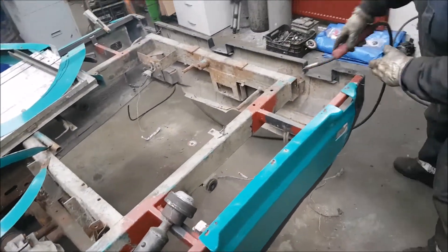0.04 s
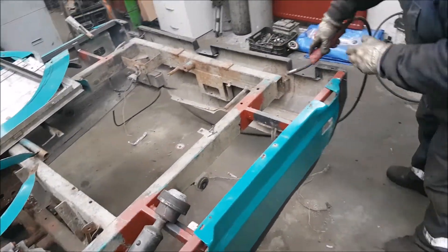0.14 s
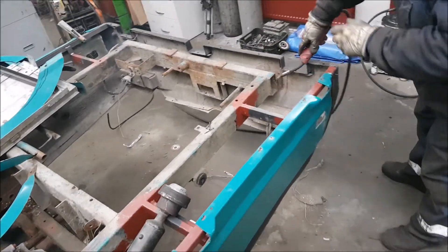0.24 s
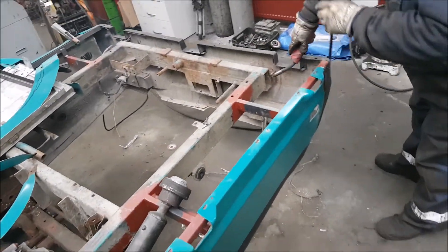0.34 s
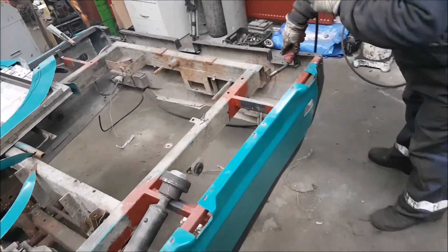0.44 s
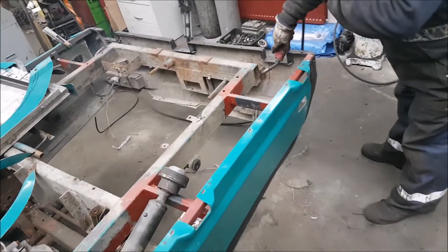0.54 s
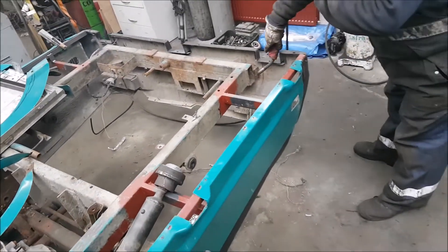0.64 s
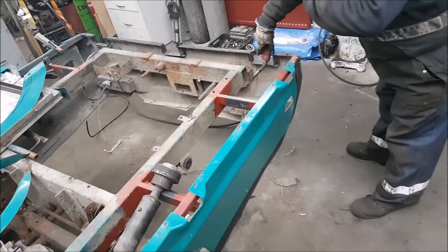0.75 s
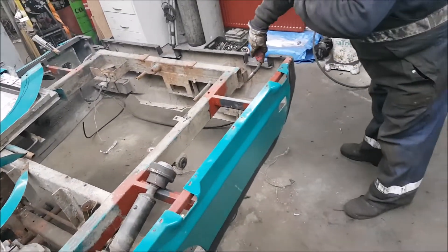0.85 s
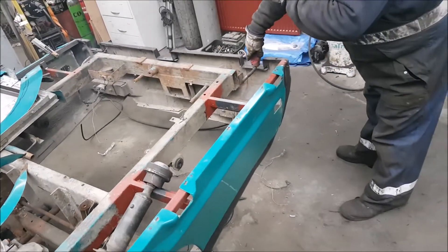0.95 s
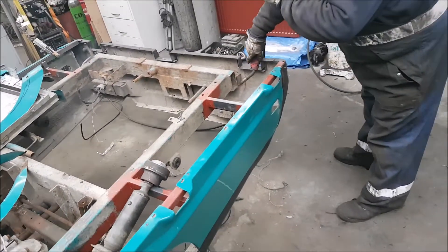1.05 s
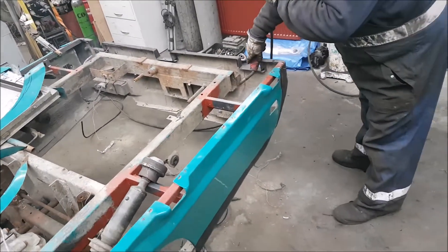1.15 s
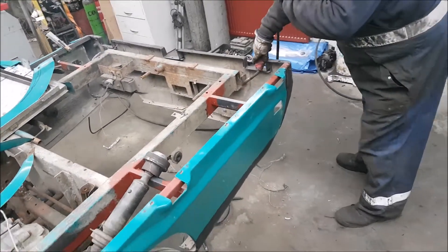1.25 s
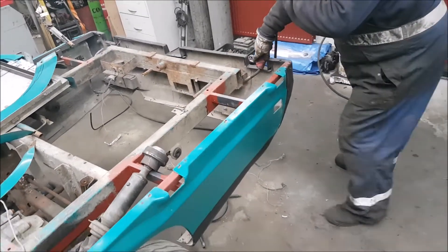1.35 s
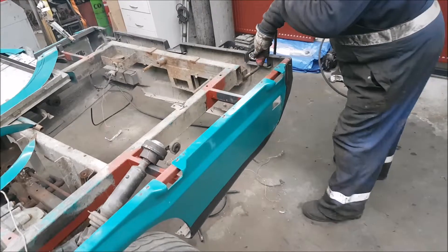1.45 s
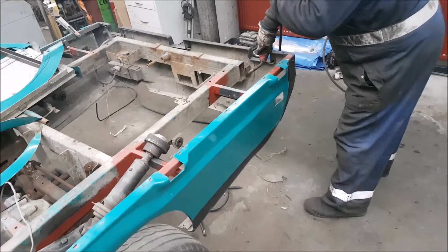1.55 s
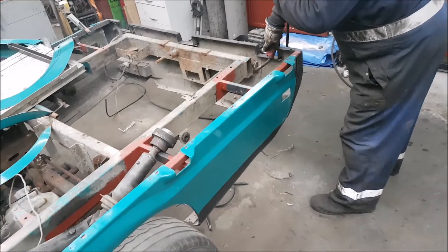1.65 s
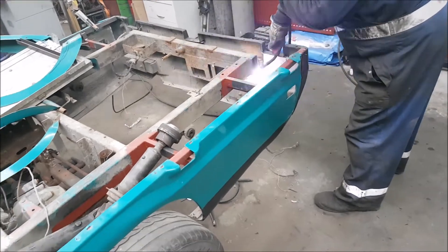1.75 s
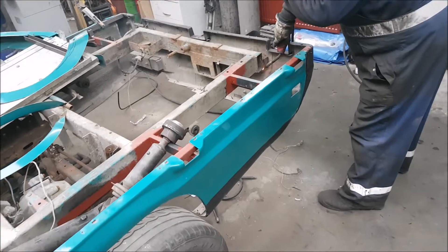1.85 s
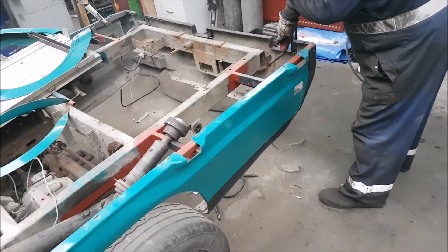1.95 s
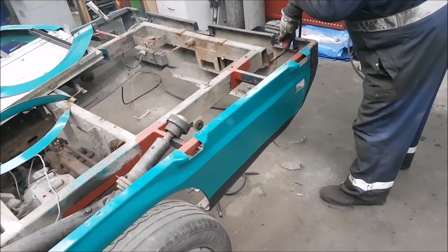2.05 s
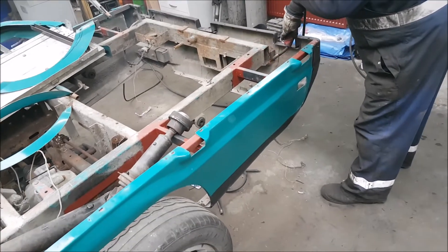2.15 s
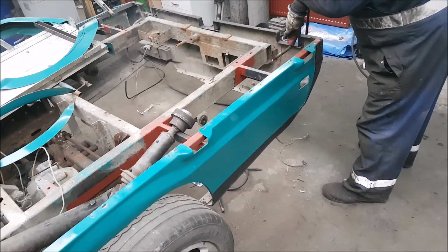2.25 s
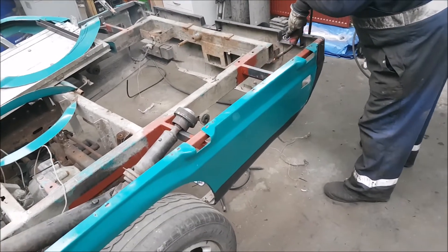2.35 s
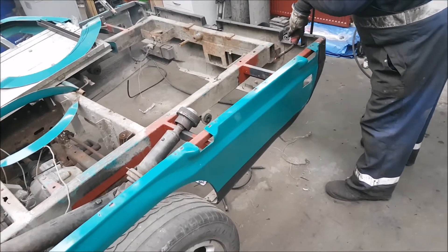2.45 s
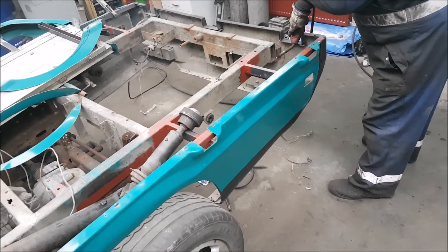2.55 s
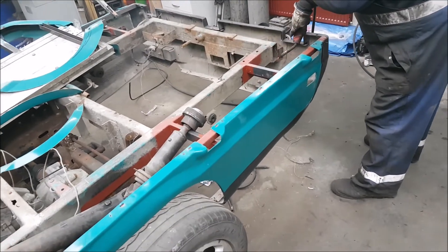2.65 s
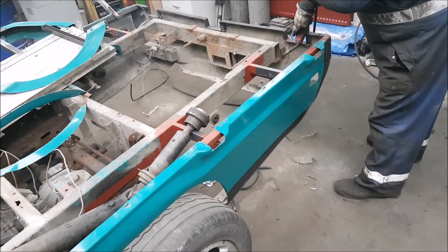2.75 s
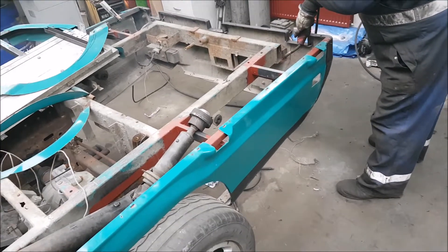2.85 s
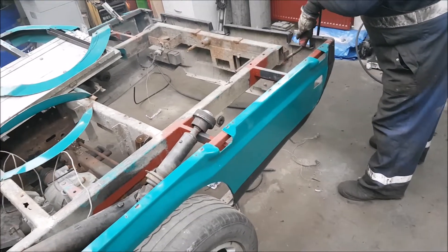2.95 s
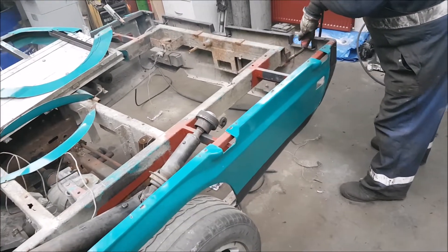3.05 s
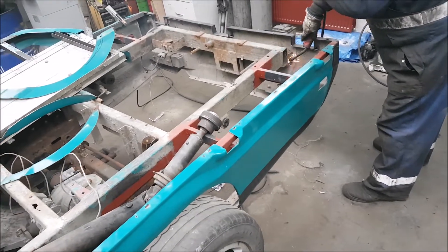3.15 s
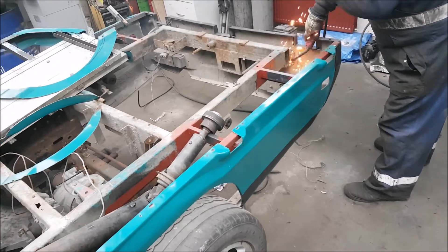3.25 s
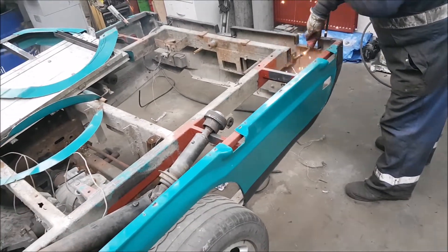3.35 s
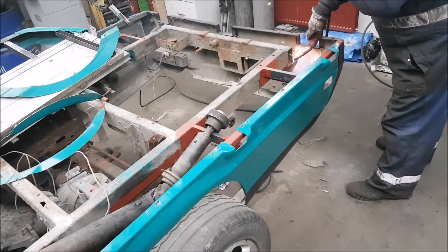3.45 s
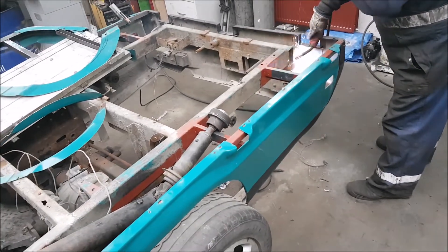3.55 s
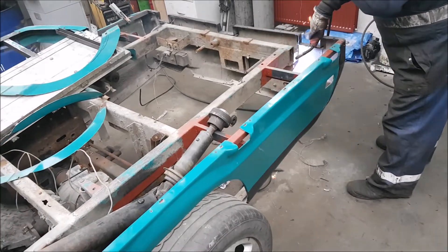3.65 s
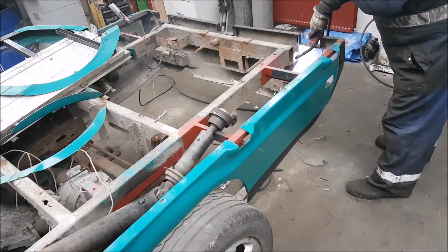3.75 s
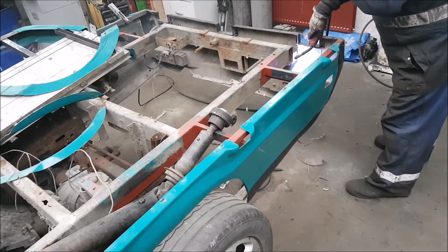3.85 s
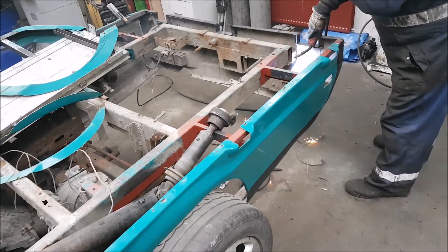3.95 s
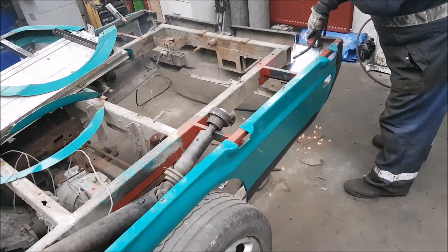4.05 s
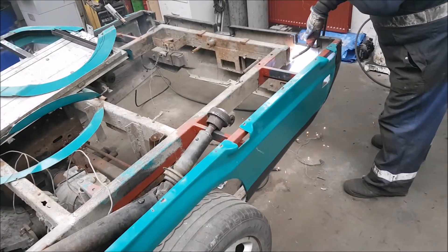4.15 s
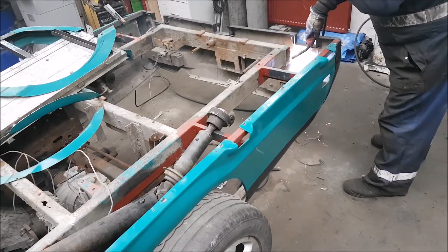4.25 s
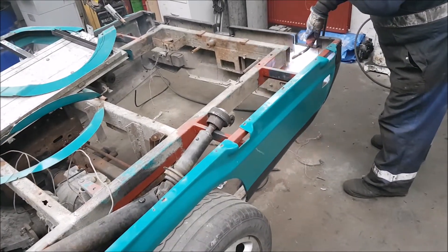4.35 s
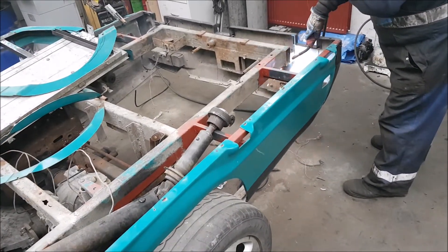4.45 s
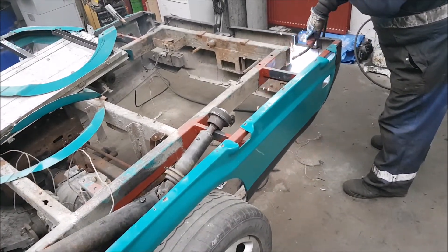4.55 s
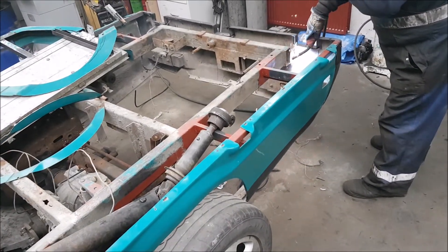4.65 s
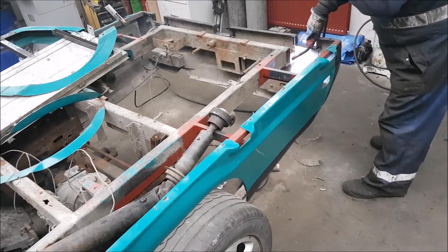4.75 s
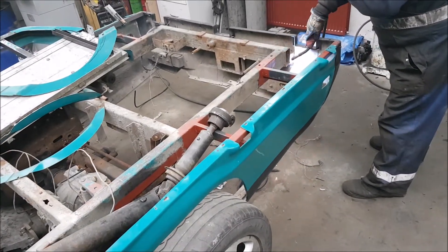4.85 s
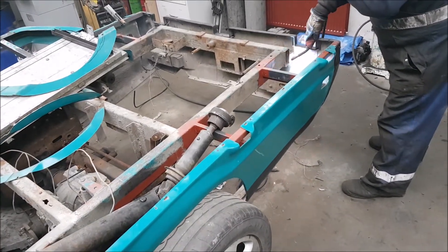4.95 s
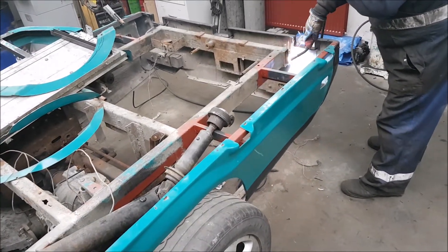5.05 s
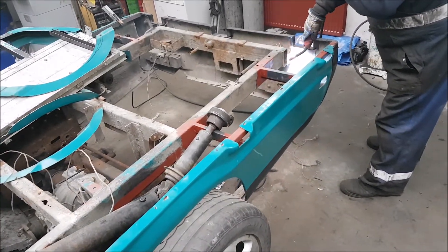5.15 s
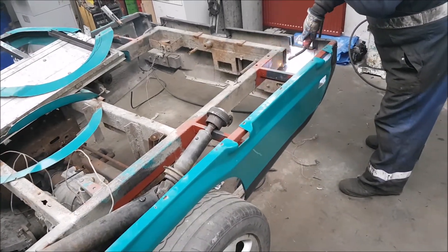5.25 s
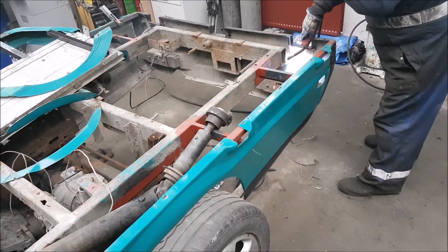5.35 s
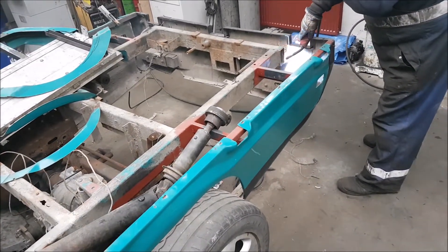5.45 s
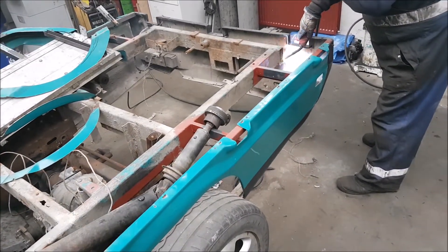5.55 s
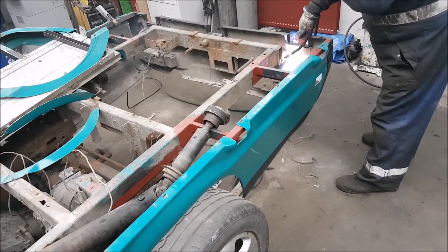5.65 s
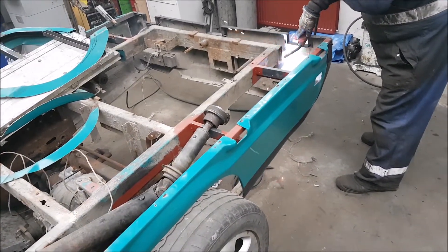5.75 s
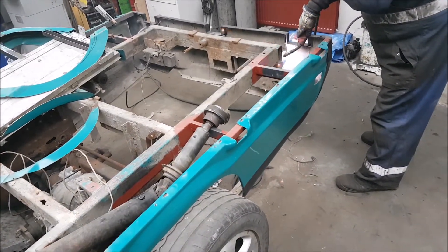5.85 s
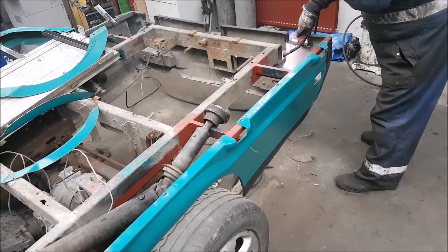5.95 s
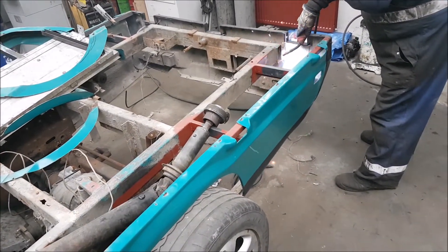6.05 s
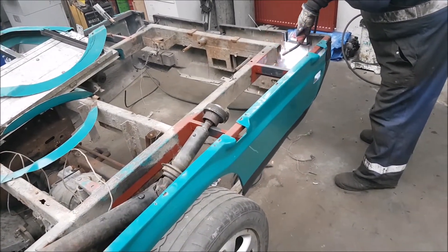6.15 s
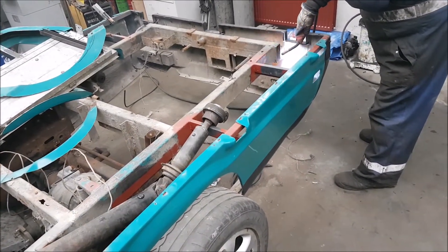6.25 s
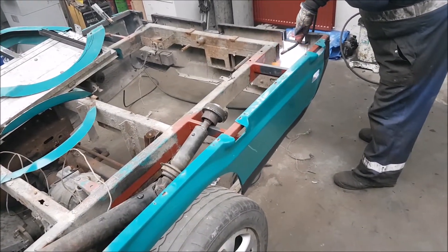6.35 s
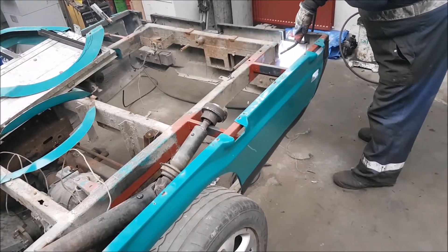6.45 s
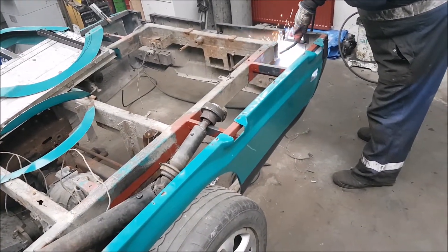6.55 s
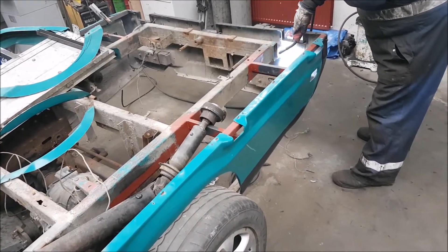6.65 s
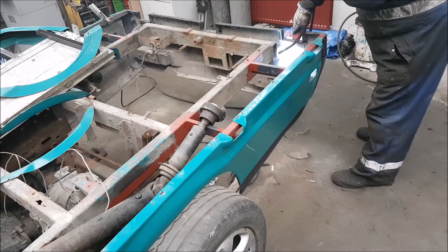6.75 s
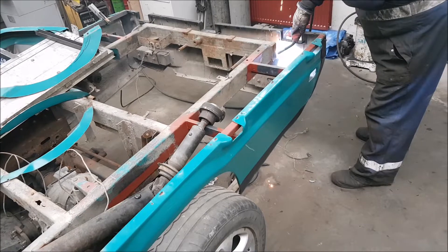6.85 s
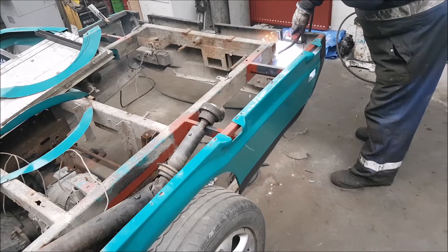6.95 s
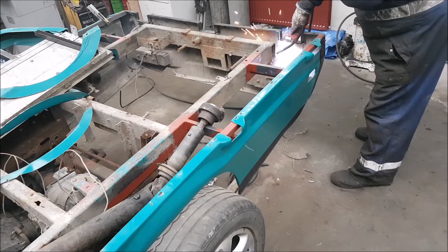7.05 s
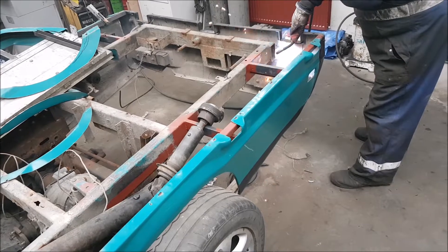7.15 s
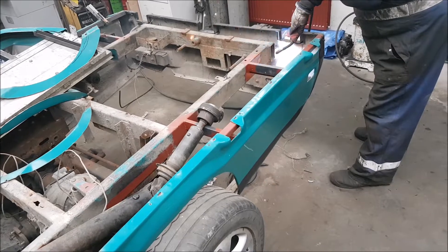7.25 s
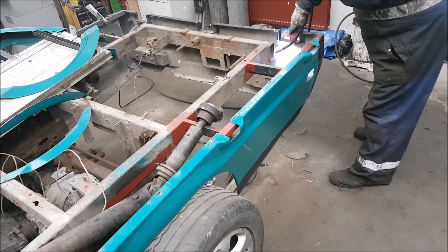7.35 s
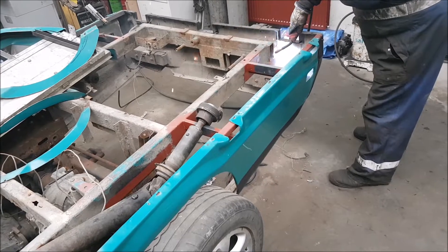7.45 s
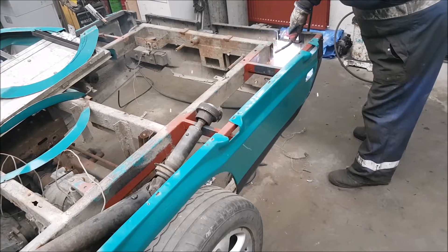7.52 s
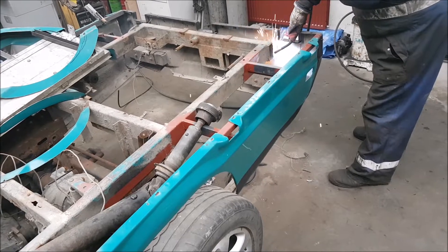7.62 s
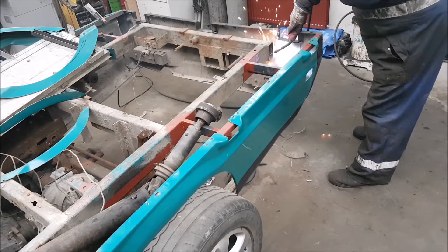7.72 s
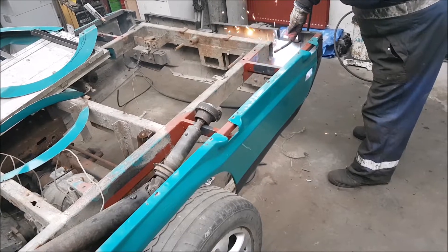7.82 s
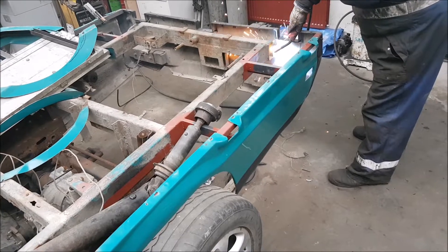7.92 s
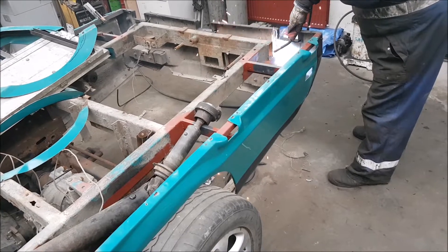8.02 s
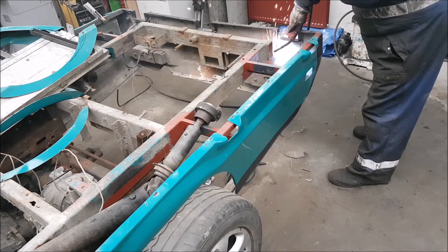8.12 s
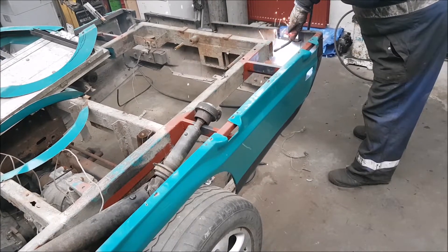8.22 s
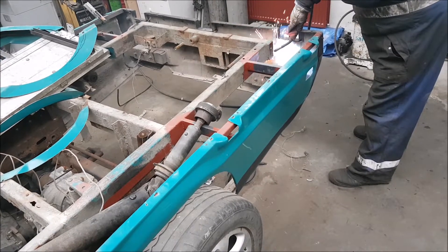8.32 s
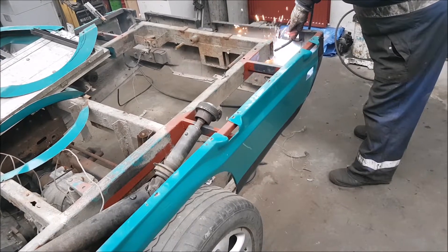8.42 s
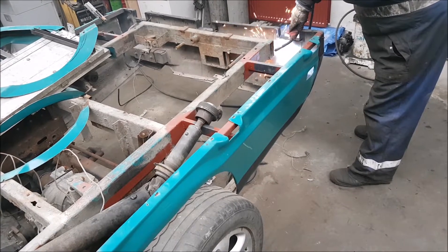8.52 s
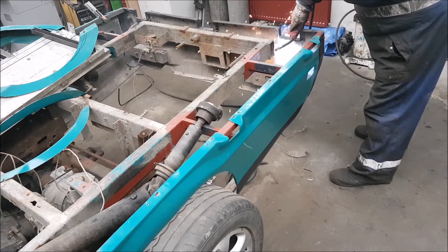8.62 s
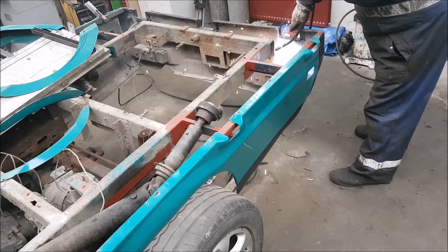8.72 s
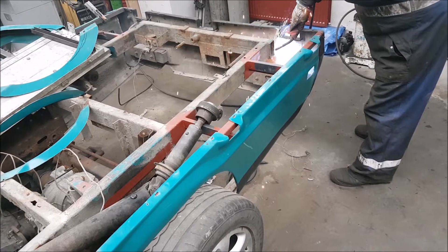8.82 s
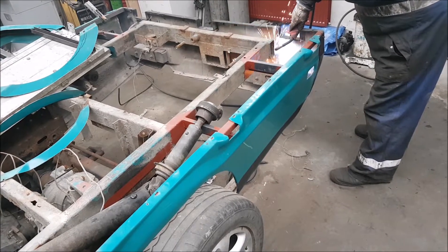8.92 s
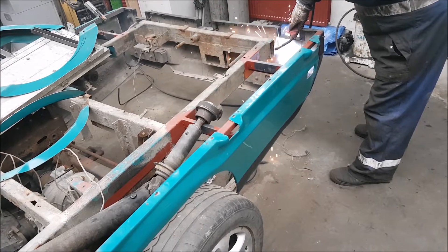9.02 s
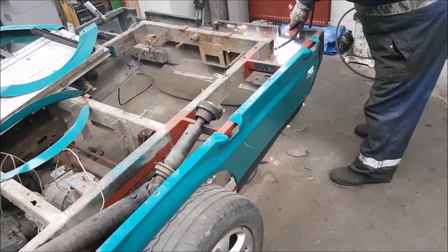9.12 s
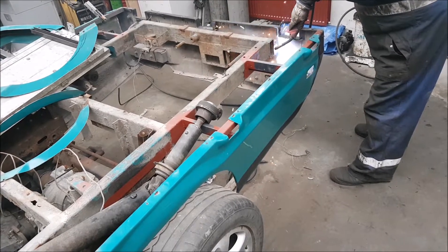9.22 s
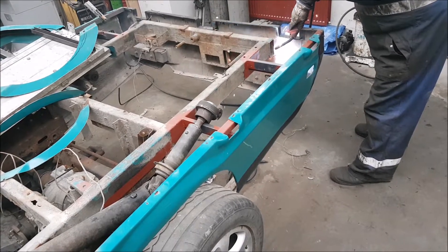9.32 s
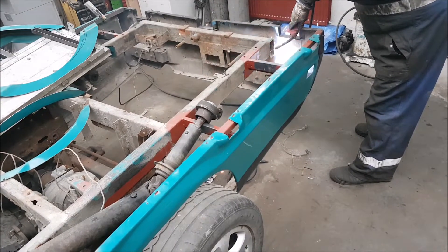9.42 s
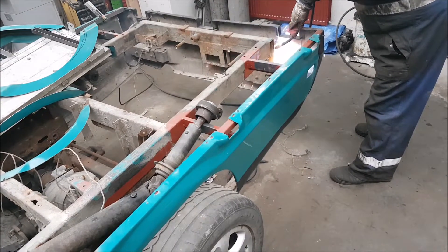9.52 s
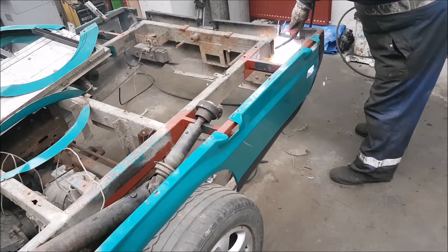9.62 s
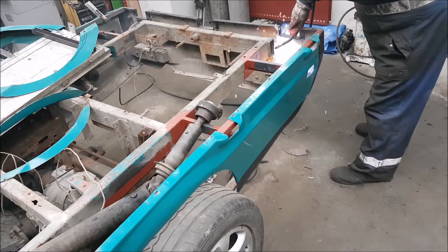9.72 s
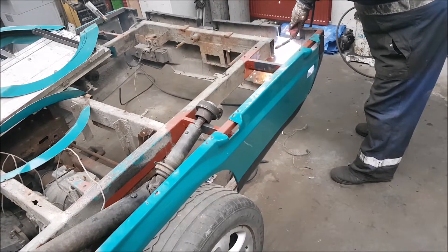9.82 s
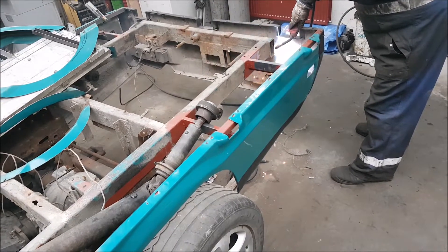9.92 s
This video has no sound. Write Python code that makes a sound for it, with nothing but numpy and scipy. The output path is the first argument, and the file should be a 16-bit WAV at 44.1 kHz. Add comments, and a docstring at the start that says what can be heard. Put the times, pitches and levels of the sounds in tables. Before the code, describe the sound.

Boots and a hose scuff across concrete, gas hisses, then a welding torch crackles in short ragged runs with violent pops in a hard, ringing garage.

```python
"""Tack welding on a car's sheet-metal side panel in a garage, a couple of metres from a hand-held phone.
Wire shorts crackle as short noise bursts at a loose beat, in runs broken by violent pops with pressure puffs.
Before that, boots and hose drag, scuffs and a panel knock sound, and shielding gas hisses as resonant noise.
Decaying noise makes the hard room ring; a fan of noise and tones runs on, with a rumble that comes and goes."""
import sys
import numpy as np
from scipy import signal
from scipy.fft import rfft, irfft
from scipy.io import wavfile

SR = 44100
rng = np.random.default_rng(int(sys.argv[2]) if len(sys.argv) > 2 else 0)


def wav_out(sig):
    """Save sig, one row per channel (or a flat mono array), as 16-bit PCM at SR to the path in sys.argv[1]."""
    wavfile.write(sys.argv[1], SR, np.round(np.clip(np.atleast_2d(sig).T, -1, 1) * 32767).astype(np.int16))


N = 440118
TIME = np.arange(N) / SR
SIZE = 2 ** 19  # FFT length, samples
FREQ = np.maximum(np.arange(SIZE // 2 + 1) * SR / SIZE, 1)  # Hz

# All levels in the tables are relative, ahead of each layer's own trim and filters.
# Fan loudness over time. Each row: time in seconds, level in dB.
FAN_LEVEL = [(0, -45.5), (3.2, -45), (3.3, -52), (6, -54), (9.98, -50)]
# Colour of the fan's rush. Each row: frequency in Hz, level in dB.
FAN_SPECTRUM = [(30, -31), (100, -16.5), (230, 0.5), (430, 3), (700, -3), (1300, -7), (2200, -8),
                (3500, -16.5), (7000, -26), (10000, -42), (15500, -29)]
# The fan's tones. Each row: frequency in Hz, level in dB.
FAN_TONES = [(404, -11), (459, -9.5)]
# Low rumble that swells before the first tack. Each row: time in seconds, level in dB.
RUMBLE_LEVEL = [(0, -43), (1.5, -60), (2, -47.5), (2.55, -43.5), (3.2, -44), (4.4, -70)]
# Colour of the rumble. Each row: frequency in Hz, level in dB.
RUMBLE_SPECTRUM = [(20, -18), (55, -5), (120, -8.5), (190, 2), (310, -16.5), (700, -59), (1500, -87)]
# A machine's hum that follows the rumble. Each row: frequency in Hz, level in dB.
HUM_TONES = [(58, -7), (96, -18), (220, -8.5), (354, -12)]
# Garage reverberation time. Each row: frequency in Hz, time to fall 60 dB in seconds.
ROOM_T60 = [(100, .4), (500, .45), (2000, .62), (5000, .64), (7500, .54), (11000, .42), (15000, .33)]
# Colour of the garage's answer. Each row: frequency in Hz, gain in dB.
ROOM_COLOUR = [(50, -0.5), (150, -4), (500, -7.5), (1500, -2.5), (4000, 4), (7000, -3.5), (15000, 0.5)]
# Boots and hose dragging. Each row: peak in seconds, rise in seconds, fall in seconds,
# dull rub level in dB, gritty scrape level in dB.
DRAGS = [(.03, .1, 0.28, -45.5, -42.5), (.155, .025, 0.1, -40.5, -31), (.225, 0.096, 0.072, -38, -29.5),
         (.32, 0.06, .1, -32.5, -40.5), (.47, 0.12, 0.16, -33.5, -42.5), (.7, 0.05, 0.096, -38, -51),
         (.87, 0.047, 0.11, -31, -39), (.96, .06, 0.13, -36, -53)]
# Colour of the dull rub. Each row: frequency in Hz, level in dB.
RUB_SPECTRUM = [(25, -11), (50, -10), (120, -5.5), (230, -1), (430, -4), (700, -10), (1500, -18.5),
                (3000, -82)]
# Colour of the gritty scrape. Each row: frequency in Hz, level in dB.
SCRAPE_SPECTRUM = [(400, -29), (900, -5), (2000, -2.5), (2600, -10), (7400, -20.5), (9700, -40),
                   (12000, -25), (16000, -28)]
# Small scuffs, and last a bright high hiss. Each row: start in seconds, level in dB, centre in Hz,
# width of one filter pass in Hz, time to the peak in seconds.
SMALL_SOUNDS = [(0.12, -39.5, 5400, 5940, 0.031), (0.127, -47, 13500, 3000, 0.034),
                (0.635, -43, 6950, 1800, 0.004), (1.382, -39.5, 1990, 3120, 0.066),
                (1.469, -26.5, 2070, 700, 0.0094), (1.47, -32.5, 4370, 4450, 0.0054),
                (1.789, -34.5, 1080, 960, 0.013), (2.593, -54.5, 4400, 5000, 0.021),
                (2.846, -55.5, 3880, 4840, 0.025), (3.198, -32, 11700, 12000, 0.0035),
                (6.34, -41, 14600, 2993, 0.11)]
# Panel modes rung by the torch. Each row: frequency in Hz, level in dB, time to fall 60 dB in seconds.
PANEL_MODES = [(678, 1, 0.22), (873, -2, 0.21), (1180, -3, 0.12)]
# Spells with the gas valve open. Each row: opening in seconds, closing in seconds, settled level in dB.
GAS_VALVE = [(1.379, 2.21, -38.5), (4.47, 4.743, -43), (4.935, 5.2, -44), (5.376, 5.72, -42),
             (6.328, 7.1, -45), (7.35, 9.77, -44)]
# Colour of the gas hiss, ahead of the nozzle. Each row: frequency in Hz, level in dB.
GAS_SPECTRUM = [(500, -3), (2000, -2), (3200, -9), (5500, 0.5), (6100, 0.5), (6500, 1), (7100, 0),
                (9000, -8), (11500, -6.5), (15500, -5.5)]
# Resonances around the torch nozzle. Each row: centre in Hz, width in Hz, lift in dB.
NOZZLE_RESONANCES = [(6600, 650, 6.3), (12700, 500, 3.5), (13950, 400, 3.5), (15150, 550, 5)]
# Violent or lone pops. Each row: time in seconds, crack level in dB, pressure puff level in dB.
POPS = [(3.224, -6.5, -17), (3.447, -18, -31.5), (3.494, -18, -28.5), (3.536, -12.5, -18),
        (3.551, -15, -42), (3.563, -13, -21), (3.571, -13.5, -26), (3.667, -17, -23.5), (4.013, -19.5, -33),
        (4.058, -15, -23.5), (4.072, -13, -16.5), (4.143, -14, -18.5), (4.191, -22, -16.5),
        (4.257, -12.5, -18), (4.283, -10, -21), (4.539, -24.5, -52), (4.594, -16, -48),
        (4.722, -15.5, -26.5), (5.016, -15.5, -21.5), (5.062, -16.5, -23), (5.087, -14, -21.5),
        (5.206, -13.5, -19), (5.399, -20.5, -25), (5.415, -15, -18.5), (5.433, -19, -29), (5.46, -16, -20),
        (5.49, -18, -20), (5.545, -17.5, -17.5), (5.571, -20, -18), (5.614, -18, -17), (5.652, -17, -25.5),
        (5.72, -21.5, -50), (5.753, -16.5, -19), (6.019, -15, -35), (6.07, -17, -20), (6.196, -21, -28.5),
        (6.507, -18, -27), (6.551, -14.5, -18.5), (6.582, -17, -22), (6.659, -18, -19), (6.721, -18, -19),
        (6.787, -16.5, -20), (6.826, -10.5, -19.5), (6.874, -14.5, -22.5), (6.981, -16, -22.5),
        (7.081, -15, -19), (7.363, -19.5, -29.5), (7.406, -17.5, -29.5), (7.428, -16.5, -31),
        (7.542, -13, -20.5), (7.598, -15, -22.5), (7.748, -20.5, -25.5), (7.931, -17, -22.5),
        (7.959, -14.5, -24), (7.983, -15.5, -23), (8.007, -14.5, -20.5), (8.058, -18.5, -30),
        (8.085, -17, -24), (8.122, -18, -23), (8.238, -18.5, -27.5), (8.333, -16, -24.5),
        (8.43, -16.5, -25.5), (8.498, -17, -24.5), (8.541, -17.5, -25), (8.613, -16.5, -22),
        (8.659, -17, -21.5), (8.701, -16, -15.5), (8.733, -17.5, -16), (8.889, -13.5, -18),
        (9.024, -15.5, -22.5), (9.376, -13, -18), (9.395, -13, -14.5), (9.474, -12.5, -21),
        (9.614, -19, -33), (9.725, -12.5, -20)]
# Molten metal blown out of the pool. Each row: start in seconds, bass level in dB,
# pulse time constant in seconds.
BLOWOUTS = [(3.226, -12, 0.0021), (3.537, -14, .0025), (3.563, -20.5, 0.0022), (4.072, -12.5, .0016),
            (4.107, -16, 0.00096), (4.126, -15, 0.0011), (4.157, -20, 0.0024), (4.194, -20, 0.0011),
            (4.213, -21, 0.0013), (5.52, -21, 0.00095), (5.571, -22, 0.00086), (5.601, -20, 0.0021),
            (5.613, -21, 0.0009), (8.701, -28, 0.0027), (8.734, -26, 0.0021), (9.393, -31, 0.0014)]
# Runs of arc. Each row: start in seconds, end in seconds, nominal shorts per second,
# mean crack level in dB, mean puff level in dB.
RUNS = [(3.536, 3.686, 117, -19, -41), (4.058, 4.211, 100, -19, -28.5), (4.566, 4.737, 86, -21.5, -37.5),
        (5.016, 5.175, 85, -20, -34.5), (5.461, 5.613, 74, -18.5, -25.5),
        (6.018, 6.238, 82.4, -20.5, -33.5), (6.551, 6.619, 80, -20.5, -37),
        (6.826, 6.892, 52.5, -19.5, -34.5), (6.982, 7.041, 59, -19, -33), (7.406, 7.877, 48.7, -21, -35.5),
        (7.931, 8.19, 47.5, -19.5, -33), (8.238, 8.66, 39, -19, -31.5), (8.701, 8.92, 38, -18.5, -31.5),
        (8.98, 9.184, 35.4, -20.5, -36.5), (9.251, 9.434, 53, -20.5, -34.5), (9.614, 9.768, 87, -19.5, -36)]
# Colour of a crack, ahead of the nozzle. Each row: frequency in Hz, level in dB.
CRACK_SPECTRUM = [(150, -12), (400, -5), (1100, -7), (2000, -14), (3000, -9), (4300, -6.5), (5800, -4.5),
                  (7600, -1.5), (8700, -9.5), (9700, -9), (11000, -5), (15500, -3.5)]

KNOCK_S, KNOCK_DB = 1.803, -35.5
# the flow rises and dies away; stored pressure gives a first surge that settles
GAS_RISE_S, GAS_FALL_S, SURGE_DB, SURGE_S = 0.023, 0.074, 5, 0.67
LINGER_S, LINGER_DB = 3.9, -46  # from here a faint hiss lingers between the runs
# scatter from short to short: timing as a share of the nominal period, then levels in dB
BEAT_JITTER, CRACK_SPREAD_DB, PUFF_SPREAD_DB = .22, 2.5, 3
TOP_HZ = 15900


def amp(db):
    """Decibels to gain."""
    return 10 ** (np.asarray(db) / 20)


def curve(rows):
    """Gain over time, joined in dB between the points."""
    seconds, db = np.transpose(rows)
    return amp(np.interp(TIME, seconds, db))


def shape(points):
    """A spectrum in dB, joined on a log-frequency axis."""
    hz, db = np.transpose(points)
    return np.interp(np.log(FREQ), np.log(hz), db)


def unit(x):
    """Scale to rms 1."""
    return x / np.sqrt(np.mean(x ** 2))


def colour(x, db):
    """Causal (minimum-phase) filter with the given gain curve in dB."""
    cepstrum = irfft(db * np.log(10) / 20)
    # fold the cepstrum onto positive time
    cepstrum[1:SIZE // 2] *= 2
    cepstrum[SIZE // 2 + 1:] = 0
    response = np.exp(rfft(cepstrum))
    return irfft(rfft(x, SIZE) * response)[..., :N]


def pair(size, alike):
    """White noise for two ears; alike is the shared part of the power."""
    shared = rng.standard_normal(size)
    separate = rng.standard_normal((2, size))
    return np.sqrt(alike) * shared + np.sqrt(1 - alike) * separate


def walk(rate):
    """Random wander in straight lines between rate knots a second, spread near 1."""
    knots = rng.standard_normal(2048)
    return np.interp(TIME * rate, np.arange(len(knots)), knots)


def noise(db, spread_hz=900):
    """Coloured stereo noise, rms 1; long waves reach both ears alike."""
    mid, side = rng.standard_normal((2, N))
    side = colour(side, db - 10 * np.log10(1 + (spread_hz / FREQ) ** 2))
    return unit(colour(mid, db) + side * np.array([[1], [-1]]))


def tones(lines, waver):
    """Steady tones whose phase wavers a little; waver in radians."""
    total = 0
    for hz, db in lines:
        phase = 2 * np.pi * hz * TIME + waver * walk(3.3)
        total = total + amp(db) * np.sqrt(2) * np.sin(phase)
    return total


def add(track, s, sound):
    """Mix a sound into a track at s seconds."""
    start = max(int(s * SR), 0)
    part = sound[..., :max(N - start, 0)]
    track[..., start:start + part.shape[-1]] += part


def background(rumble_db=-2):
    """A fan's rush and wavering tones, and a humming rumble that comes and goes."""
    rush = noise(shape(FAN_SPECTRUM), spread_hz=830) * amp(.5 * walk(18))
    fan = (rush + tones(FAN_TONES, waver=0.77)) * curve(FAN_LEVEL)
    rumble = amp(rumble_db) * noise(shape(RUMBLE_SPECTRUM), spread_hz=680)
    hum = tones(HUM_TONES, waver=0.22)
    return fan + (rumble + hum) * curve(RUMBLE_LEVEL)


def garage(x, wet_db=-4.0, build_s=0.00011, echo_s=.0172, echo_db=-19):
    """Nearby steel scatters the sound at once, one wall answers, and the tail's top dies soonest."""
    t = np.arange(SR) / SR
    hz, t60 = np.transpose(ROOM_T60)
    # one second of noise, so each FFT bin is 1 Hz
    spectrum, bins = rfft(rng.standard_normal((2, SR))), np.arange(SR // 2 + 1)
    edges = np.geomspace(20, SR / 2, 21)
    tail = 0
    for low, high in zip(edges, edges[1:]):
        seconds = np.interp(np.log(low * high) / 2, np.log(hz), t60)
        band = irfft(spectrum * ((bins >= low) & (bins < high)))
        tail = tail + band * np.exp(-np.log(1000) * t / seconds)
    build = 1 - np.exp(-t / build_s)
    response = unit(tail * build) / np.sqrt(SR) * amp(wet_db)
    for ear in response:
        add(ear, echo_s * rng.uniform(.97, 1.03), amp([echo_db]))
    wet = signal.fftconvolve(x, response, axes=1)[:, :N]
    return colour(wet, shape(ROOM_COLOUR))


def shuffle(trim_db=-2):
    """Boots and hose drag over the concrete, catching and slipping; each drag swells and dies away."""
    catch, grit = 1.5 * walk(35), 1.8 * walk(190)  # dB
    dull, gritty = 0, 0
    for s, rise, fall, dull_db, gritty_db in DRAGS:
        age = TIME - s
        swell = np.exp(-np.where(age < 0, (age / rise) ** 2, age / fall))
        dull = np.hypot(dull, amp(dull_db) * swell)
        gritty = np.hypot(gritty, amp(gritty_db) * swell)
    rub = noise(shape(RUB_SPECTRUM)) * dull * amp(trim_db + catch)
    scrape = noise(shape(SCRAPE_SPECTRUM)) * gritty * amp(trim_db + grit)
    return rub + scrape


def small_sounds():
    """Small scuffs and a bright high hiss, as band noise; one torch knock rings the panel's modes."""
    out, t = np.zeros((2, N)), np.arange(SR // 2) / SR
    for s, db, hz, width, length in SMALL_SOUNDS:
        b, a = signal.iirpeak(hz, hz / width, fs=SR)
        once = signal.lfilter(b, a, pair(len(t), alike=0.57))
        band = unit(signal.lfilter(b, a, once))
        swell = t / length * np.exp(1 - t / length)
        add(out, s, amp(db) * band * swell)
    ring = 0
    for hz, db, t60 in PANEL_MODES:
        ring = ring + amp(db) * np.sin(2 * np.pi * hz * t) * np.exp(-np.log(1000) * t / t60)
    add(out, KNOCK_S, amp(KNOCK_DB) * ring)
    return out


def nozzle():
    """The nozzle's resonances as a lift in dB."""
    return sum(db / (1 + (2 * (FREQ - hz) / width) ** 2) for hz, width, db in NOZZLE_RESONANCES)


def gas():
    """Shielding gas hisses through the nozzle while the valve is held, strongest soon after it opens."""
    flow = amp(LINGER_DB) * (TIME > LINGER_S)
    for opens, closes, db in GAS_VALVE:
        age, shut = np.maximum(TIME - opens, 0), np.maximum(TIME - closes, 0)
        pressure = amp(db + SURGE_DB * np.exp(-age / SURGE_S))
        gate = (1 - np.exp(-age / GAS_RISE_S)) * np.exp(-shut / GAS_FALL_S)
        flow = np.hypot(flow, pressure * gate)
    flutter = amp(2.1 * walk(30))
    return noise(shape(GAS_SPECTRUM) + nozzle()) * flow * flutter


def shorts():
    """Every burst as (s, crack dB, puff dB): each pop restarts the beat, small shorts fill the gaps."""
    out = list(POPS)
    pops = np.array(POPS)[:, 0]
    for start, end, rate, crack_db, puff_db in RUNS:
        chance = iter(rng.standard_normal((128, 3)))
        half_beat = .5 / rate
        # a run's ends get a small short of their own unless a pop is close by
        edges = [s for s in (start, end) if np.abs(pops - s).min() > half_beat]
        marks = sorted(edges + [s for s in pops if start - half_beat <= s <= end + half_beat])
        beats = [(s, 0) for s in edges]
        for a, b in zip(marks, marks[1:]):
            between = np.linspace(a, b, round((b - a) * rate) + 1)[1:-1]
            beats += [(s, BEAT_JITTER / rate) for s in between]
        for (s, jitter), (late, sharp, deep) in zip(beats, chance):
            crack_level = crack_db + CRACK_SPREAD_DB * sharp
            puff_level = puff_db + PUFF_SPREAD_DB * deep
            out.append((s + jitter * late, crack_level, puff_level))
    return out


def puff(width_s):
    """Gas that expands suddenly: a steep push, then a longer suction."""
    age = np.arange(SR // 20) / SR / width_s
    return (1 - age) * np.exp(-age)


def puffs(bursts, width_s=0.00029, growth_per_db=0.062, width_spread=.18,
          puff_db=14, blowout_db=4, right_db=2, turn=1.23):
    """Stronger bursts give longer, deeper pulses; each pulse's phase (radians) is turned between the ears."""
    out, bass = np.zeros((2, N))
    for (s, _, db), chance in zip(bursts, rng.standard_normal(1024)):
        width = width_s * np.exp(growth_per_db * (db + 23.5) + width_spread * chance)
        add(out, s, amp(db + puff_db) * puff(width))
    for s, db, length in BLOWOUTS:
        add(bass, s, amp(db + blowout_db) * puff(length))
    # (Hz, dB)
    puff_colour = [(30, 10.5), (200, -1.5), (350, 3), (900, 1), (1500, 1.0), (2100, 0.5),
                   (3500, -5.5), (8000, -26.0)]
    bass_colour = [(20, -6), (130, 5), (300, 2.5), (1500, -20)]
    right = colour(out, shape(puff_colour)) + colour(bass, shape(bass_colour))
    left = np.real(signal.hilbert(right, SIZE)[:N] * np.exp(-1j * turn))
    return np.array([left * amp(-right_db / 2), right * amp(right_db / 2)])


def crack(db, swell_s=0.00069, left_db=0.96, sway_db=5.0):
    """The wire bridge bursts and the arc strikes again: a few milliseconds of ragged, broadband noise."""
    length, side = rng.standard_normal(2)
    age = np.arange(SR // 100) / SR / (swell_s * np.exp(.17 * length))  # in swell times
    spectrum = rfft(pair(len(age), alike=0.66) * age ** 2 * np.exp(-age))
    # partly even out the burst's spectrum, so it sounds broadband
    even = irfft(spectrum / np.sqrt(np.abs(spectrum)), len(age))
    burst = even * np.minimum(age, 1) / (1 + (age / 8) ** 4)
    tilt_db = np.array([[1], [-1]]) * (left_db + sway_db * side) / 2
    return unit(burst) * amp(db + tilt_db)


def scatter(x, turn=2.48, step_hz=900):
    """Each band reaches the right ear with its own random phase, which widens the sound."""
    knots = rng.standard_normal(256)
    phase = turn * np.interp(FREQ / step_hz, np.arange(len(knots)), knots)  # radians
    right = irfft(rfft(x[1], SIZE) * np.exp(1j * phase))[:N]
    return np.array([x[0], right])


def cracks(bursts, crack_db=-2):
    """All the wire's bursts, coloured by the nozzle, with the right ear's phase scattered."""
    out = np.zeros((2, N))
    for s, db, _ in bursts:
        add(out, s - .001, crack(db))  # noise starts 1 ms ahead, to swell into the burst
    return scatter(colour(out, shape(CRACK_SPECTRUM) + nozzle() + crack_db))


def scene():
    """The arc and the work around it sound in the garage, over the fan."""
    floor = background()
    work = small_sounds() + amp(-3.5) * gas() + shuffle()
    bursts = shorts()
    near = work + cracks(bursts) + puffs(bursts)
    return near + garage(near) + floor


def record(dry, ceiling=1.0):
    """The phone rounds the loudest peaks and cuts the top."""
    rounded = ceiling * np.tanh(dry / ceiling)
    low_pass = signal.ellip(10, .2, 70, TOP_HZ, fs=SR, output="sos")
    return signal.sosfilt(low_pass, rounded)


dry = scene()
out = record(dry)
wav_out(out)
```